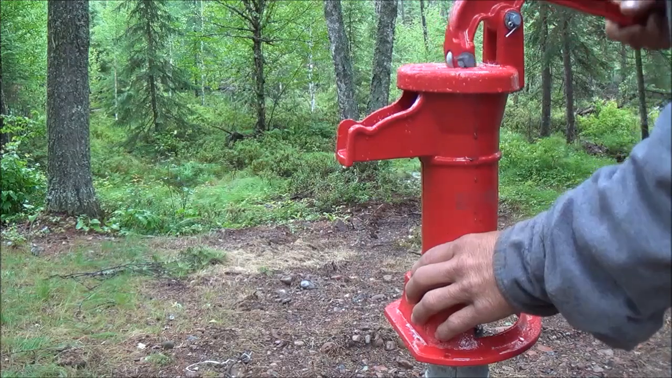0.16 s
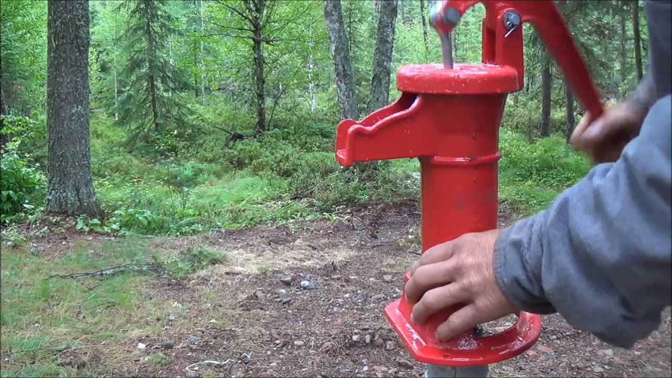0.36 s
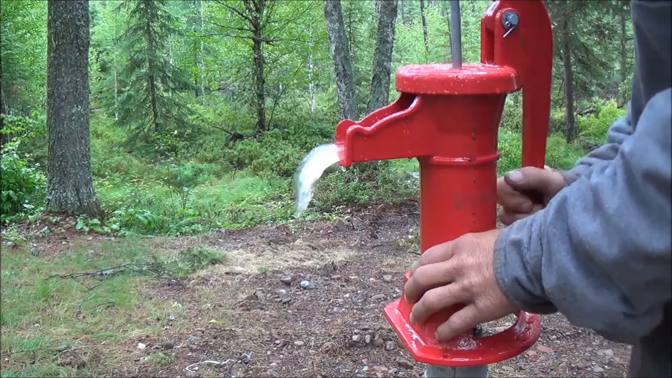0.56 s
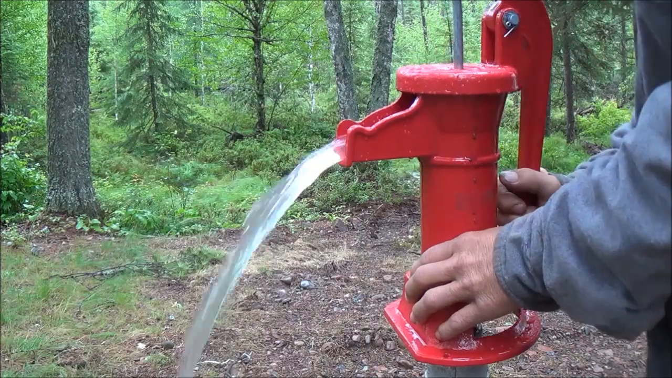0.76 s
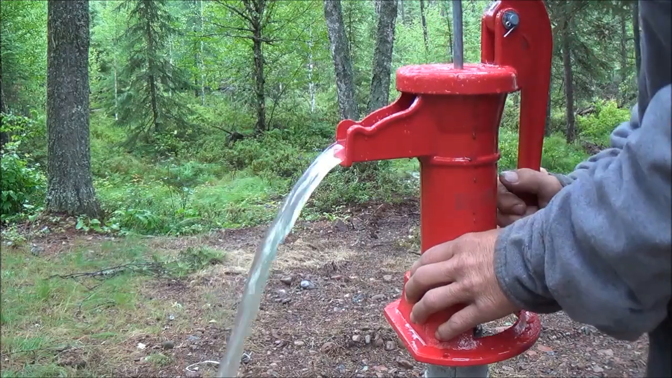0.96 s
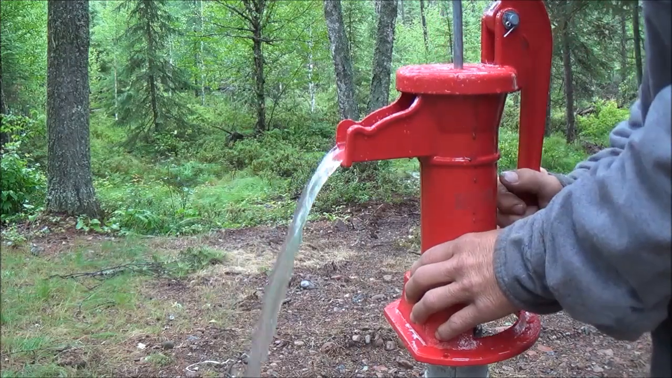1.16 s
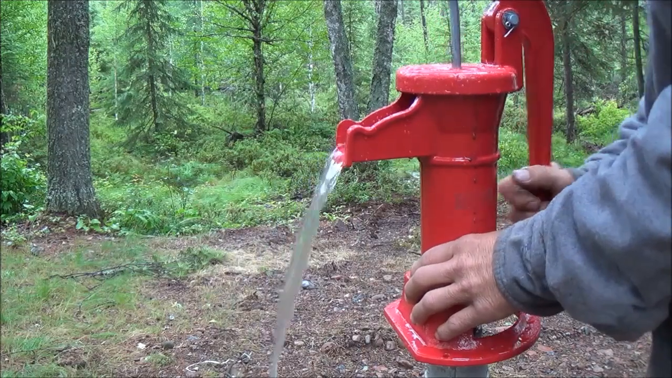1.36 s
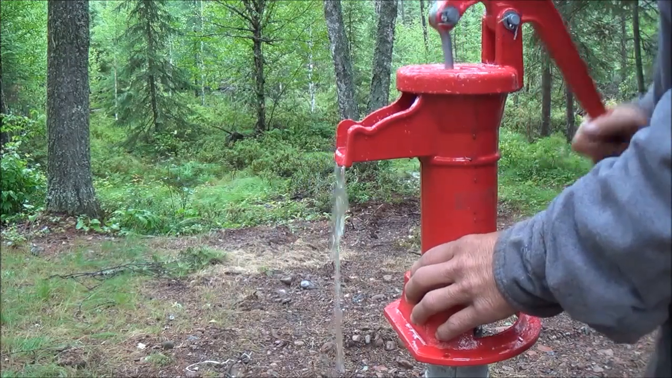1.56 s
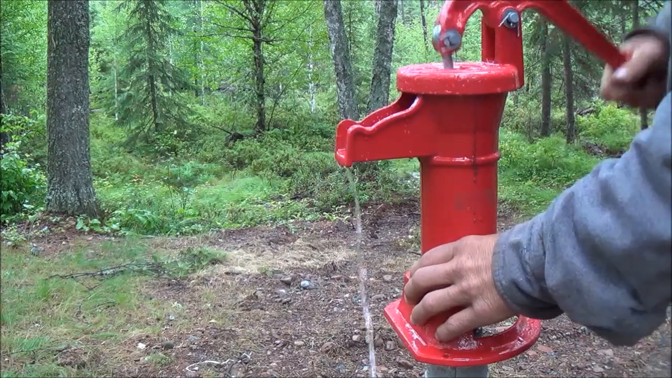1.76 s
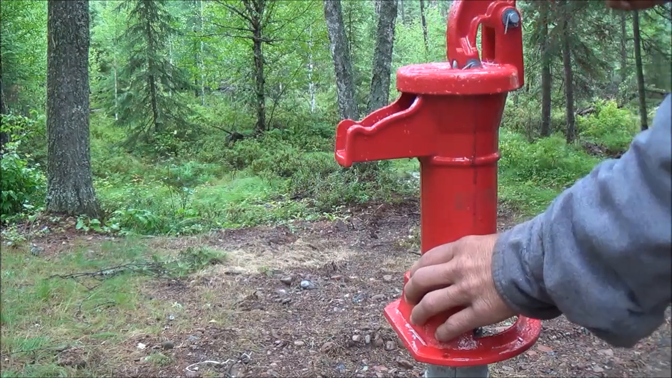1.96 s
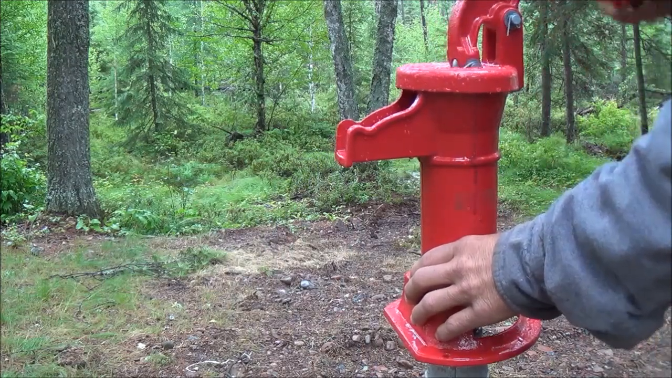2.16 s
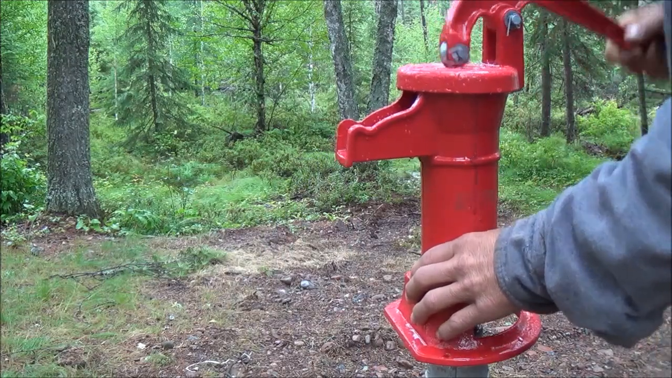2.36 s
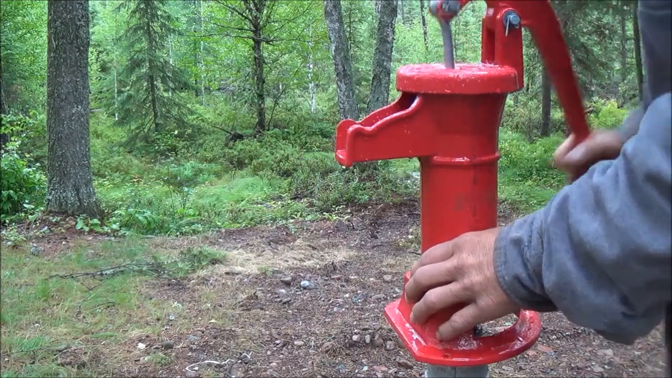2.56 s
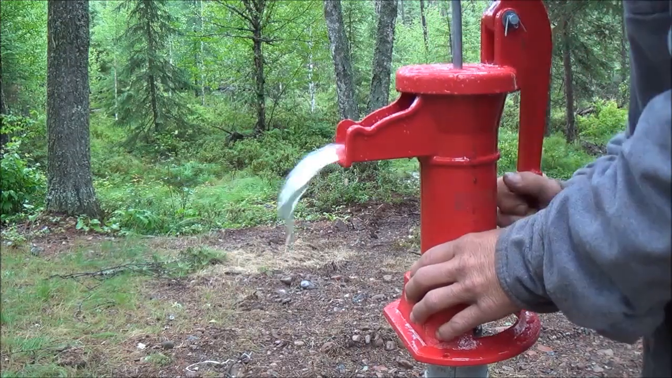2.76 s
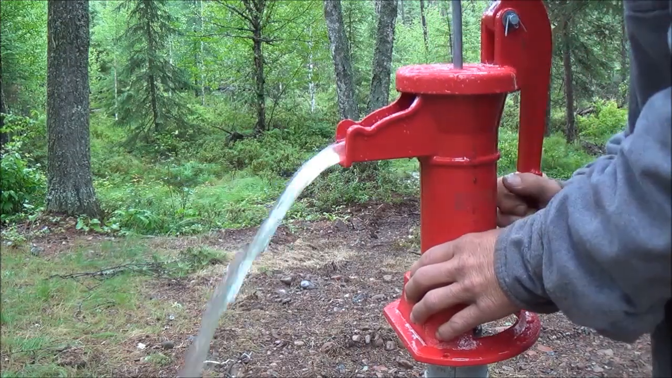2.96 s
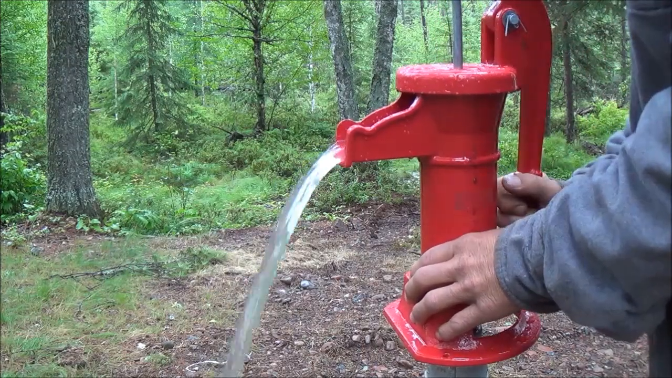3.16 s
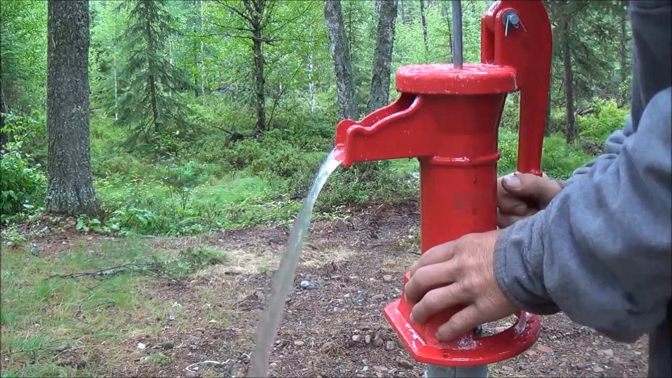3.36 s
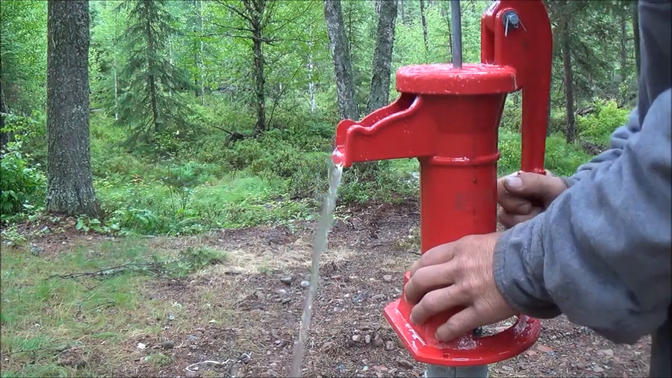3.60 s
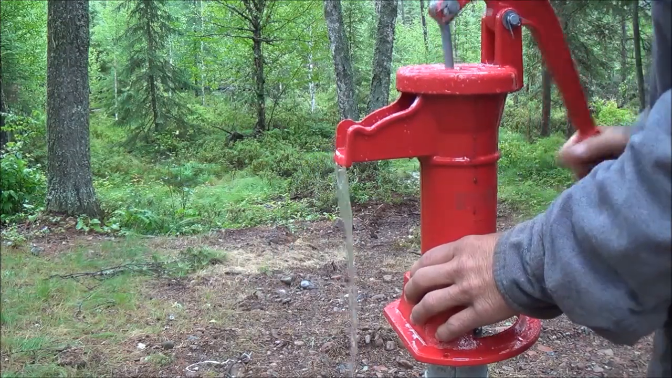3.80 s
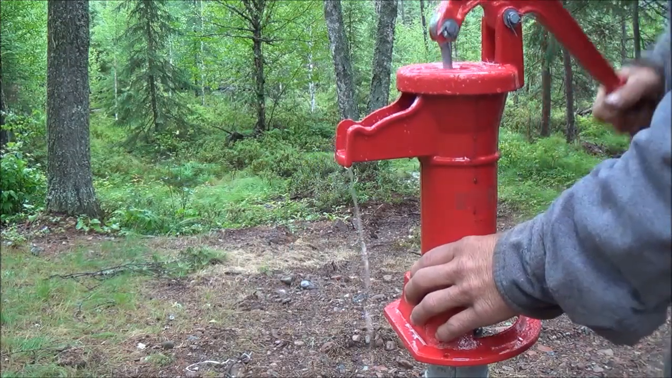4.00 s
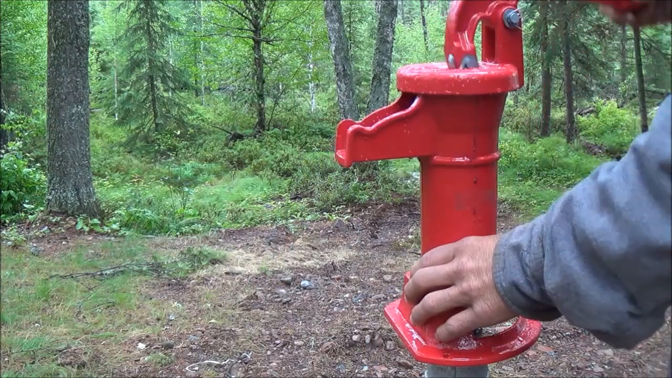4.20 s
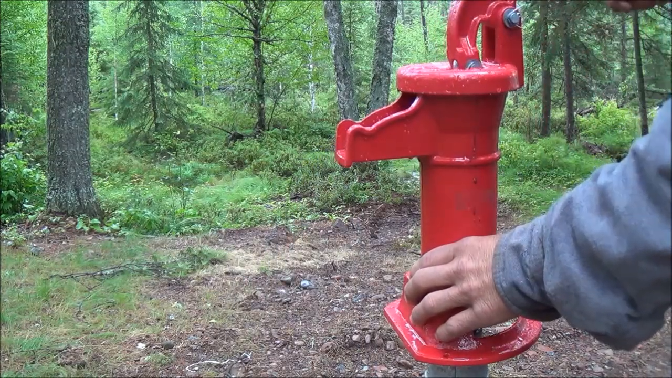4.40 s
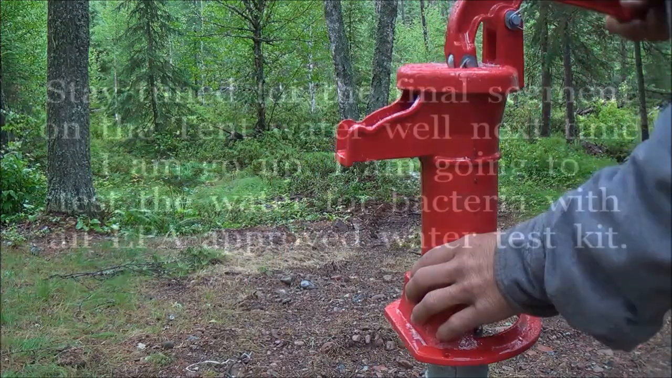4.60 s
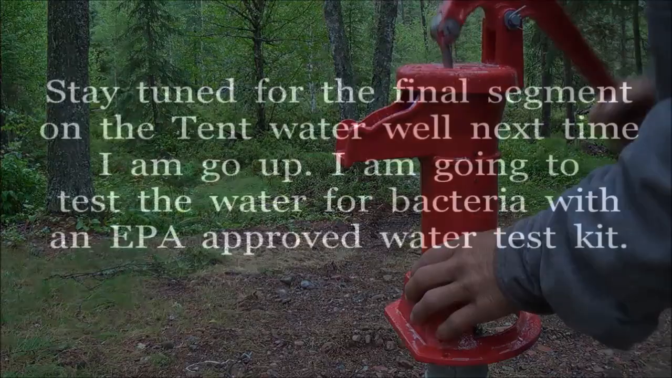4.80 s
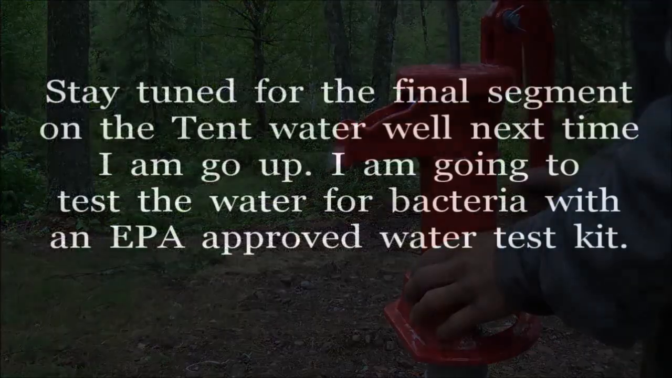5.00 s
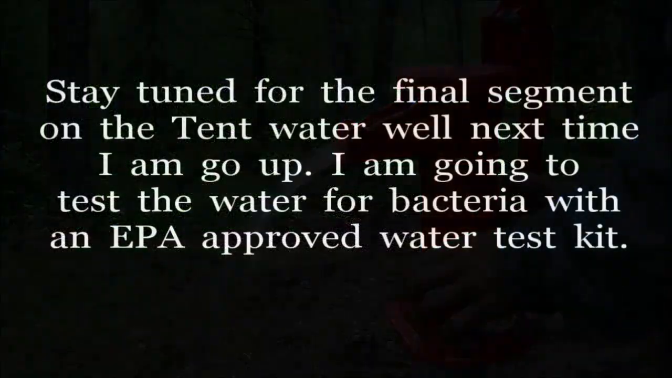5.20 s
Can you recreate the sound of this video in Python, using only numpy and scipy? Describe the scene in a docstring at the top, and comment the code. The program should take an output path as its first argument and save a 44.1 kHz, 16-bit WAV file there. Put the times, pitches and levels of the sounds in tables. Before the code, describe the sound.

Last drops patter, an iron pump handle clanks, and water bursts out in two bright, gurgling surges onto wet ground in a forest clearing.

```python
"""Single drops patter and air gulps in a spout first: the tail of a surge from a cast-iron hand pump in a
forest clearing. Two more surges follow: shaped spray over a lower slosh, with noise-burst drops, and gulps
and bubbles as fluttering tones. Between them clanks and a rubbing rod excite the modes of the casting;
the linkage taps and the pivot squeaks. Forest echo, wind on the microphone, hiss and a far hum lie below."""
import sys
import numpy as np
from scipy import signal
from scipy.fft import rfft, irfft
from scipy.io import wavfile

SR = 44100
rng = np.random.default_rng(int(sys.argv[2]) if len(sys.argv) > 2 else 0)


def transcribe(signal):
    """Save signal, clipped to [-1, 1], as a 16-bit WAV file at the path in sys.argv[1]."""
    frames = np.atleast_2d(signal).T
    limited = np.clip(frames, -1, 1)
    pcm = np.round(limited * 32767).astype(np.int16)
    wavfile.write(sys.argv[1], SR, pcm)


N = 231348

# water surges on the ground, one curve each: t/s, splash level/dB, puddle slosh level/dB
SURGE_CURVES = [
    [(0.0, -50, -77), (0.03, -44.5, -38), (0.16, -60, -117)],
    [(0.968, -59, -60), (0.976, -26.5, -49), (1.01, -20.5, -47.5), (1.15, -21.5, -30.5), (1.33, -21.5, -39),
     (1.5, -25.5, -43.5), (1.63, -23.5, -31), (1.8, -26.5, -48.5), (1.95, -31, -43.5), (2.12, -47.5, -63),
     (2.21, -41, -32), (2.26, -49, -65)],
    [(3.137, -50.5, -77), (3.2, -22.5, -40), (3.35, -21.5, -34.5), (3.6, -24, -44.5), (3.735, -26, -38),
     (3.91, -21.5, -42), (4.1, -35, -42.5), (4.38, -52.5, -60), (4.49, -47.5, -57), (4.537, -26, -47),
     (4.6, -100, -63)],
]
# splash spectrum, relative: f/Hz, density/dB
SPLASH_SPECTRUM = [(590, -9), (1000, -8.5), (2250, 10.5), (3690, 9), (4640, 11.5), (5180, 8.5), (10600, 12),
                   (11000, 11), (14300, -71), (22000, -120)]
# slosh spectrum, relative: f/Hz, density/dB
SLOSH_SPECTRUM = [(290, -49.5), (500, -17.5), (874, 1), (1080, -3), (1660, 3), (2500, -16), (3250, -15),
                  (5500, -120)]
# single drops landing: t/s, peak level before panning/dB, band pitch f/Hz
DROP_LANDINGS = [(0.016, -12, 10800), (0.0262, -10.5, 4450), (0.0394, -13, 9600), (0.063, -18, 3950),
                 (0.069, -9, 10300), (0.084, -15, 5570), (0.109, -14, 8590), (0.129, -12, 3560),
                 (0.196, -32, 10000), (0.553, -35, 10300), (0.974, -12.5, 10500), (0.9846, -13, 5400),
                 (1.023, -11, 11200), (1.0774, -3, 2400), (1.247, -16, 9500), (1.285, -11, 5400),
                 (1.299, -12, 1860), (1.34, -10, 1700), (1.426, -10, 3530), (1.5032, -5.5, 11000),
                 (1.5885, -13, 8300), (1.6136, -2.5, 2120), (1.6802, 0.5, 2440), (1.755, -6, 10900),
                 (1.776, -7, 3390), (1.7875, -4.5, 2450), (1.8036, -17, 2870), (1.829, -5.5, 3020),
                 (1.885, -0.5, 7450), (1.903, -18, 7400), (1.932, -7, 10000), (1.945, -5.5, 4240),
                 (1.958, -4, 3400), (1.9782, -6.5, 9500), (1.996, -10, 4990), (2.0065, -4.5, 7200),
                 (2.0292, -5, 10800), (2.05, -9, 4430), (2.084, -18, 5750), (2.0985, -16.5, 7750),
                 (2.1153, -18.5, 10700), (2.146, -6, 3350), (2.166, -22, 7040), (2.1927, -8, 3800),
                 (2.209, -2.5, 10200), (2.9307, -30.5, 4800), (3.1407, -11.5, 10000), (3.1562, -10.5, 5760),
                 (3.1675, -7, 7200), (3.1856, -3, 2900), (3.218, -2.5, 2850), (3.3057, -10, 2270),
                 (3.513, -18, 9570), (3.5411, -4.5, 9840), (3.59, -16, 3960), (3.738, -4, 1420),
                 (3.754, -1, 2970), (3.807, -25, 8000), (3.8348, -2, 1960), (3.872, -2, 10800),
                 (3.9252, 0, 2980), (3.97, -2.5, 4680), (3.989, -7.5, 7360), (4.0094, 0.5, 10400),
                 (4.0244, -1, 2360), (4.0342, -8, 2980), (4.0516, -14, 7630), (4.0638, -7.5, 10650),
                 (4.0737, -4.5, 4950), (4.0895, -8.5, 2920), (4.102, -7, 10100), (4.113, -6.5, 10100),
                 (4.13, -11, 7330), (4.142, -2, 10100), (4.1652, -6, 7050), (4.1923, -8, 4530),
                 (4.206, -12, 5000), (4.2255, -10.5, 7500), (4.2368, -7.5, 5200), (4.2668, -2, 11500),
                 (4.279, -14, 6000), (4.3057, -6, 4870), (4.313, -8.5, 1440), (4.332, -8, 10100),
                 (4.357, -13, 10000), (4.385, -21.5, 10200), (4.4214, -19, 6900), (4.497, -16, 1790),
                 (4.511, -24, 3150), (4.5252, -9.5, 4700), (4.533, -7, 2320), (4.973, -28, 8080)]
# air gulping in the spout: t/s, tone level/dB, starting pitch f/Hz, t60/s
SPOUT_GULPS = [(0.023, -24.5, 598, 0.059), (0.063, -14.5, 475, 0.03), (0.14, -35, 585, 0.1),
               (1.405, -33.5, 702, 0.053), (1.547, -25, 584, 0.022), (1.578, -26.5, 602, 0.21),
               (1.636, -19, 595, 0.069), (1.695, -36.5, 398, 0.062), (1.735, -16.5, 606, 0.094),
               (1.754, -23, 580, 0.089), (1.836, -33.5, 589, 0.16), (1.876, -21.5, 602, 0.065),
               (1.905, -33, 620, 0.072), (1.928, -30.5, 301, 0.16), (1.955, -30, 735, 0.075),
               (1.995, -24, 774, 0.091), (2.019, -25, 560, 0.078), (2.09, -36.5, 392, 0.093),
               (2.148, -26.5, 563, 0.063), (2.181, -15.5, 561, 0.074), (2.212, -13, 560, 0.055),
               (3.879, -27.5, 581, 0.25), (3.914, -17.5, 614, 0.0097), (3.944, -37, 553, 0.068),
               (3.983, -16, 585, 0.1), (4.025, -17, 618, 0.063), (4.039, -18.5, 599, 0.089),
               (4.059, -38, 630, 0.062), (4.165, -22.5, 630, 0.017), (4.179, -30, 680, 0.19),
               (4.235, -19.5, 615, 0.078), (4.269, -32, 615, 0.075), (4.306, -33, 629, 0.087),
               (4.329, -31, 577, 0.078), (4.427, -40.5, 588, 0.11), (4.461, -29, 452, 0.2),
               (4.513, -17, 557, 0.1), (4.538, -16.5, 582, 0.06)]
# small bubbles bursting in the puddle: t/s, tone level/dB, starting pitch f/Hz, t60/s
PUDDLE_BUBBLES = [(1.063, -23, 2280, 0.048), (1.2106, -22.5, 2480, 0.052), (1.6222, -21.5, 1960, .024),
                  (1.6796, -19, 2580, 0.018), (1.7356, -15, 1736, 0.047), (1.86, -41, 1510, .03),
                  (1.9217, -23.5, 1580, 0.03), (2.0204, -24, 1950, 0.015), (3.5927, -11, 1950, 0.0073),
                  (3.71, -24, 1300, 0.032), (3.8352, -20, 1980, 0.028), (3.914, -23, 1330, .026),
                  (4.1026, -23.5, 2280, 0.014), (4.5146, -34, 2070, 0.033), (4.5366, -28, 2000, 0.036),
                  (4.568, -40, 1750, .03)]
# linkage taking up slack: t/s, level/dB
SLACK_CLANKS = [(0.652, -14.5), (2.744, -12.5), (5.077, -13)]
# modes of the cast-iron head and handle: f/Hz, level/dB, t60/s
IRON_MODES = [(845, -5, 0.071), (933, -7.5, 0.092), (1276, -25, 0.073), (1530, -15, 0.02),
              (1700, -12, 0.027), (1860, -11, 0.095), (1950, 0.5, 0.015), (2160, -13, 0.031),
              (2110, -18, 0.044), (2750, -1.5, 0.035), (3354, -14.5, 0.064), (3680, -3, 0.012),
              (4214, 1, 0.0077), (4148, 3.5, 0.013), (4240, 4, 0.0084), (4800, -8, 0.04),
              (4950, -8.5, 0.018), (5290, -11, 0.028), (6510, -25.5, 0.1), (8800, -13, 0.031),
              (10100, -11, 0.016)]
# handle in motion between surges, one curve each: t/s, rod rub level/dB, background hiss level/dB
STROKE_CURVES = [
    [(0.0, -58, -44), (0.38, -49, -47.5), (0.5, -55, -51.5), (0.71, -66, -51.5), (0.95, -57, -54.5)],
    [(2.26, -65, -48), (2.45, -52, -49), (2.63, -53.5, -48), (2.68, -54.5, -51), (2.92, -53.5, -51.5),
     (3.12, -63, -55.5)],
    [(4.6, -72, -48.5), (4.79, -50.5, -48), (4.96, -61, -49), (5.246, -58, -48.5)],
]
# light taps in the linkage as the handle turns round: t/s, level/dB
LINKAGE_TAPS = [(0.262, -24.5), (0.325, -44), (0.472, -31), (2.426, -29.5), (2.654, -34.5), (2.894, -34),
                (4.79, -30)]
# pivot squeaks, one curve each: t/s, f/Hz, level/dB
SQUEAK_CURVES = [
    [(.4, 1080, -75), (.43, 1048, -55), (.455, 975, -58), (.485, 859, -55), (.52, 920, -58),
     (.56, 940, -61), (.58, 920, -80)],
    [(2.43, 1004, -60), (2.47, 1070, -52), (2.51, 1116, -60), (2.545, 1142, -61), (2.58, 1038, -60),
     (2.61, 970, -43.5), (2.65, 850, -57), (2.705, 938, -51), (2.735, 937, -78)],
    [(4.89, 997, -78), (4.92, 942, -46), (4.96, 915, -56), (5.0, 935, -66), (5.04, 927, -62),
     (5.07, 900, -80)],
]
# wind on the microphone: t/s, level/dB
GUST_CURVE = [(0.0, -50), (0.76, -48.5), (1.2, -60), (1.58, -43), (2.03, -50.5), (2.59, -44), (2.75, -54),
              (3.25, -44.5), (3.7, -36.5), (4.05, -39), (4.3, -35), (4.5, -33.5), (4.95, -38), (5.25, -50)]
# wind spectrum, relative: f/Hz, density/dB
WIND_SPECTRUM = [(12, -52), (20, 20.5), (43, -7), (64, 5), (158, -2.5), (296, -18.5), (400, -30),
                 (520, -56), (880, -120)]
# puffs thumping the microphone: t/s, peak level/dB, f/Hz
WIND_BUFFETS = [(3.305, -40, 110), (3.523, -24, 68.4), (3.76, -36.5, 113), (3.854, -29, 92),
                (4.112, -34, 54), (4.229, -39, 40.4), (4.469, -37, 114), (4.62, -33, 56.5)]
# hiss spectrum, relative: f/Hz, density/dB
HISS_SPECTRUM = [(120, -28), (200, -7), (229, -25), (270, -8.5), (440, 2.5), (595, -6.5), (636, -2),
                 (11000, -13), (14300, -63), (22000, -120)]
# left-right likeness of wind and hiss: f/Hz, correlation/1
CHANNEL_LIKENESS = [(30, 0.19), (60, 0.78), (120, 0.71), (300, 0.78), (1000, 0.3), (4000, 0.087),
                    (10000, 0.82)]

DROPLETS_PER_S, FULL_FLOW_DB, RATE_EXPONENT = 3500, -23, 0.3   # rate at full flow; exponent on splash gain
CHOP_FULL_DB, CHOP_THIN_DB, THIN_BELOW_DB = 0.63, 4, 24   # chop grows over this fall below full flow
SPLASH_SIDE_DB = -14.5   # side re mid
GURGLE_PER_S, SPOUT_HZ, SPOUT_T60_S = 400, 599, 0.02
GURGLE_RE_SPLASH_DB, GURGLE_RE_GULP_DB, STIR_T60_S = -27.5, -18, 0.12
DROP_T60_S, DROP_T60_SPREAD_DB, DROP_PAN_SPREAD_DB = 0.023, 0.5, 3   # median t60; chance spreads
CHIRPS_PER_S, CHIRP_RE_SLOSH_DB, CHIRP_LOW_HZ, CHIRP_HIGH_HZ = 32, -10, 730, 2450   # least level
GULP_LEAD_RAD = 0.73   # left ahead of right
REBOUND_DELAY_S, REBOUND_RE_CLANK_DB = 0.036, -24
SHIVER_RE_CLANK_DB, SHIVER_T60_S = -10, 0.2   # countless faint modes of the casting, as one noise
FOREST_T60_S, FOREST_DB = 0.55, -26.5
BUFFET_SWELL_S, BUFFET_T60_S = 0.0063, 0.12
HUM_HZ, HUM_WIDTH_HZ, HUM_DB = 121, 8.9, -54
MIC_LOW_HZ, MIC_CEILING, MIC_TOP_HZ = 44.3, 0.56, 11050   # ceiling re full scale 1
LEFT_RIGHT = np.array([[1], [-1]])


def from_db(db):
    """Gain of a level in dB."""
    return 10 ** (np.asarray(db) / 20)


def rms_one(x):
    """Scaled to rms 1."""
    return x / np.sqrt(np.mean(x ** 2) + 1e-20)


def in_time(rows):
    """Columns of a curve table at every sample."""
    s, *columns = np.transpose(rows)
    return [np.interp(np.arange(N) / SR, s, c) for c in columns]


def at_hz(points, hz):
    """A table read on a log-frequency axis."""
    table_hz, values = np.transpose(points)
    return np.interp(np.log(hz), np.log(table_hz), values)


def bin_hz():
    """FFT bin frequencies, kept off zero for the log axis."""
    return np.maximum(np.fft.rfftfreq(N, 1 / SR), 1)


def colour(x, spectrum):
    """White input shaped to a spectrum; rms 1."""
    return rms_one(irfft(rfft(x) * from_db(at_hz(spectrum, bin_hz())), N))


def wide_noise(spectrum):
    """Stereo noise whose channel correlation depends on frequency; rms 1."""
    hz = bin_hz()
    mid, side = rfft(rng.standard_normal((2, N)))
    alike = np.clip(at_hz(CHANNEL_LIKENESS, hz), -1, 1)
    both = np.sqrt(1 + alike) * mid + np.sqrt(1 - alike) * side * LEFT_RIGHT
    return rms_one(irfft(both * from_db(at_hz(spectrum, hz)), N))


def drift(rate_hz):
    """Slow chance of rms 1: noise at every 20th sample through a double one-pole low-pass."""
    r = np.exp(-40 * np.pi * rate_hz / SR)
    noise = rng.standard_normal(N // 20 + 2002)
    slow = signal.lfilter([1], [1, -2 * r, r * r], noise)[2000:]   # settled part
    return np.interp(np.arange(N) / 20, np.arange(len(slow)), rms_one(slow))


def ring(x, hz, t60):
    """Two-pole resonance: a unit click starts a decaying sine of height about 1."""
    r, w = from_db(-60 / (t60 * SR)), 2 * np.pi * hz / SR
    return signal.lfilter([0, np.sin(w)], [1, -2 * r * np.cos(w), r * r], x + 1e-18)


def filtered(x, order, hz, kind):
    """Butterworth filter."""
    return signal.sosfilt(signal.butter(order, hz, kind, fs=SR, output="sos"), x)


def add(out, s, sound):
    """Mixes a short sound in at time s."""
    i = round(s * SR)
    out[:, i:i + sound.shape[1]] += sound[:, :N - i]


def impacts(per_s, spread_db):
    """Random clicks of uneven size; sparse and dense stretches carry the same power on average."""
    sizes = from_db(spread_db * np.minimum(rng.exponential(1, N), 4)) * rng.choice([-1, 1], N)
    return sizes * (rng.random(N) < per_s / SR) / np.sqrt(per_s)


def surge():
    """The stream breaking on the ground: bright splash, lower slosh, and the gurgle in the spout."""
    t = np.arange(N) / SR
    gains = np.zeros((2, N))
    for rows in SURGE_CURVES:
        on = (t >= rows[0][0]) & (t < rows[-1][0])
        gains = gains + on * from_db(in_time(rows))
    splash_gain, slosh_gain = gains
    per_s = DROPLETS_PER_S * (splash_gain / from_db(FULL_FLOW_DB)) ** RATE_EXPONENT
    per_s = np.clip(per_s, 300, 20000)
    mid, side = (droplets(per_s, spread_db=6.5, cycles=8.3, bed=1.13) for _ in range(2))
    spray = mid + from_db(SPLASH_SIDE_DB) * side * LEFT_RIGHT
    gurgle_gain = stirred() + from_db(GURGLE_RE_SPLASH_DB) * splash_gain
    spout = gurgle_gain * (gurgle() + 0.39 * gurgle() * LEFT_RIGHT)
    # steady when full, choppy when thin
    thin = np.clip((FULL_FLOW_DB - 20 * np.log10(splash_gain + 1e-9)) / THIN_BELOW_DB, 0, 1)
    clumps = from_db((CHOP_FULL_DB + CHOP_THIN_DB * thin) * drift(35))
    slops = from_db(2.0 * drift(25))
    splash = clumps * splash_gain * colour(spray, SPLASH_SPECTRUM)
    return splash + slops * slosh_gain * colour(spray, SLOSH_SPECTRUM) + spout


def droplets(per_s, spread_db, cycles, bed):
    """Impacts and a bed of spray dealt to pitches that ring a few cycles; patches of pitches flicker."""
    hits = rms_one(impacts(per_s, spread_db)) + bed * rng.standard_normal(N)
    pitches, dealt = np.geomspace(400, 12000, 24), rng.integers(0, 24, N)
    # three neighbouring pitches share a patch
    patches = [from_db(1.5 * drift(30) + 3.2 * drift(90)) for _ in range(8)]
    rings = np.zeros(N)
    for k, hz in enumerate(pitches):
        rings += hz * patches[k // 3] * ring(hits * (dealt == k), hz, cycles / hz)
    return from_db(2.1 * drift(126)) * rms_one(rings)


def gurgle():
    """Bubbles of many sizes burst in the spout and excite its air column; rms 1."""
    hits = impacts(GURGLE_PER_S, spread_db=3.5)
    pitches, dealt = np.geomspace(340, 2100, 12), rng.integers(0, 12, N)
    plops = sum(ring(hits * (dealt == k), hz, 14.0 / hz) for k, hz in enumerate(pitches))
    soft = signal.lfilter([0.15], [1, -0.85], plops)
    return rms_one(rms_one(soft) + 1.74 * rms_one(ring(soft, SPOUT_HZ, SPOUT_T60_S)))


def stirred():
    """Each gulp leaves the water in the spout stirred; the stir dies away."""
    kicks = np.zeros(N)
    for s, db, *_ in SPOUT_GULPS:
        kicks[round(s * SR)] = from_db(db + GURGLE_RE_GULP_DB)
    return signal.lfilter([1], [1, -from_db(-60 / (STIR_T60_S * SR))], kicks)


def drops():
    """Each drop is a dying noise burst, strongest in a band around its pitch."""
    out, t = np.zeros((2, N)), np.arange(2000) / SR
    chance = rng.standard_normal((len(DROP_LANDINGS), 2, 2001))
    for (s, db, hz), noise in zip(DROP_LANDINGS, chance):
        # last column: chance in length and place
        t60 = DROP_T60_S * from_db(DROP_T60_SPREAD_DB * noise[0, -1])
        pan_db = DROP_PAN_SPREAD_DB * noise[1, -1]
        burst = noise[:, :-1] * from_db(-60 * t / t60) * np.minimum(t / 0.00054, 1)
        band = signal.butter(1, [hz / 1.05, min(hz * 1.46, 0.45 * SR)], "band", fs=SR)
        mid, side = signal.lfilter(*band, burst) + 0.37 * np.diff(burst, prepend=0)
        stereo = (mid + from_db(SPLASH_SIDE_DB) * side * LEFT_RIGHT) / np.abs(mid).max()
        add(out, s, from_db(db + pan_db / 2 * LEFT_RIGHT) * stereo)
    return out


def bursting(rows, rise, rough, lead_rad, swell, slap_db):
    """Water slaps shut on an air pocket, which swells into a fluttering tone whose pitch creeps up."""
    out, t = np.zeros((2, N)), np.arange(6000) / SR
    chance = rng.standard_normal((len(rows), 7000))
    flutter = rms_one(filtered(chance, 2, 70, "low")[:, 1000:])
    for (s, db, hz, t60), wobble, noise in zip(rows, flutter, chance[:, :6000]):
        shape = (1 - np.exp(-t / max(swell, 1e-4))) ** 1.3 * from_db(-60 * t / t60)
        phase = 2 * np.pi * hz * (t + rise * t ** 2) + rough * wobble + lead_rad / 2 * LEFT_RIGHT
        tone = np.sin(phase) * (1 + rough * wobble[::-1]) * shape / shape.max()
        band = signal.butter(2, [hz * 0.54, hz * 2.0], "band", fs=SR)
        slap_shape = from_db(slap_db - 60 * t / 0.054) * np.minimum(t / 0.0021, 1)
        slap = slap_shape * rms_one(signal.lfilter(*band, noise))
        add(out, s, from_db(db + 0.6 * LEFT_RIGHT) * (tone + slap))
    return out


def gulps():
    """Air pockets gulping in the spout; the left channel leads in phase."""
    return bursting(SPOUT_GULPS, rise=0.53, rough=0.41, lead_rad=GULP_LEAD_RAD, swell=0.0037, slap_db=-6.5)


def bubbles():
    """Small puddle bubbles: purer tones with almost no slap."""
    return bursting(PUDDLE_BUBBLES, rise=1.66, rough=0.11, lead_rad=-0.17, swell=0.0021, slap_db=-28)


def chirps():
    """Tiny bubbles burst at random while the puddle sloshes, each gliding upward."""
    rows = []
    for curve in SURGE_CURVES:
        s, _, slosh_db = np.transpose(curve)
        length_s = s[-1] - s[0]
        count = round(CHIRPS_PER_S * length_s)
        for when, size, pitch in rng.random((300, 3))[:count]:
            at = s[0] + when * length_s
            hz = CHIRP_LOW_HZ * (CHIRP_HIGH_HZ / CHIRP_LOW_HZ) ** pitch
            db = np.interp(at, s, slosh_db) + CHIRP_RE_SLOSH_DB + 6.1 * size
            rows.append((at, db, hz, 31.0 / hz))
    return bursting(rows, rise=2.7, rough=0.22, lead_rad=-0.31, swell=0.0025, slap_db=7)


def radiated(x):
    """Small iron parts radiate no bass."""
    return filtered(x, 4, 650, "high")


def clanks():
    """One firm blow and a few ms of chattering contact ring the iron; a weaker rebound follows."""
    blow, chatter, shiver = np.zeros((3, 1, N))
    t = np.arange(12000) / SR
    chance = rng.standard_normal((len(SLACK_CLANKS), 3, 1, 12000))
    for (s, db), (first, second, wash) in zip(SLACK_CLANKS, chance):
        touch = from_db(db - 60 * t / 0.035) * np.minimum(t / 0.00012, 1)
        add(blow, s + 0.001015, from_db([[db]]))
        add(chatter, s, touch * first)
        add(chatter, s + REBOUND_DELAY_S, from_db(REBOUND_RE_CLANK_DB) * touch * second)
        add(shiver, s, from_db(db + SHIVER_RE_CLANK_DB - 60 * t / SHIVER_T60_S) * wash)
    strike = blow[0] + 0.04 * chatter[0]
    modes = np.zeros(N)
    for k, (hz, db, t60) in enumerate(IRON_MODES):
        modes += from_db(db + 2.5) * (-1) ** k * ring(strike, hz, t60)   # alternating sign
    clack = filtered(chatter[0] + shiver[0], 1, [1700, 5500], "band")
    return radiated(modes + from_db(-4.5) * clack)


def rod_rub(rub_db):
    """The rod rubs in the head: uneven scratch noise drives the iron modes, damped to 0.6 of their t60."""
    scratch = filtered(rng.standard_normal(N) * from_db(1.5 * drift(40)), 1, 1200, "low")
    modes = sum(from_db(db) * ring(scratch, hz, 0.6 * t60) for hz, db, t60 in IRON_MODES)
    return radiated(from_db(rub_db) * (rms_one(modes) + 0.2 * rms_one(scratch)))


def taps():
    """Damped by the hand, a tap is a dull burst with no ring."""
    out, t = np.zeros((1, N)), np.arange(1500) / SR
    for (s, db), noise in zip(LINKAGE_TAPS, rng.standard_normal((len(LINKAGE_TAPS), 1, 1500))):
        add(out, s, from_db(db - 60 * t / 0.024) * noise)
    return filtered(out[0], 1, [500, 3500], "band")


def squeak():
    """Stick and slip in the pivot: a weak tone that glides and wavers."""
    hz, db = in_time(np.concatenate(SQUEAK_CURVES))
    phase = 2 * np.pi * np.cumsum(hz * (1 + 0.025 * drift(56.5))) / SR
    return np.sqrt(2) * from_db(db + 2.7 * drift(50)) * np.sin(phase)


def forest(x):
    """Trunks scatter the sound back as a dull, dying wash, partly different in each channel."""
    t = np.arange(20000) / SR
    wash = rng.standard_normal((2, 20000)) * from_db(-60 * t / FOREST_T60_S) * (t > 0.008)
    mid, side = filtered(wash, 1, [600, 5000], "band")
    response = mid + 0.5 * side * LEFT_RIGHT
    response = response / np.sqrt(np.sum(response[0] ** 2))
    return from_db(FOREST_DB) * signal.fftconvolve(x[None], response, axes=1)[:, :N]


def wind():
    """Wind on the microphone: low noise under a gust curve with random swells."""
    return from_db(in_time(GUST_CURVE)[0] + 3.6 * drift(17)) * wide_noise(WIND_SPECTRUM)


def buffets():
    """A puff of air pushes the diaphragm: a few low, damped swings."""
    out, t = np.zeros((1, N)), np.arange(12000) / SR
    shape = (1 - np.exp(-t / BUFFET_SWELL_S)) * from_db(-60 * t / BUFFET_T60_S)
    for s, db, hz in WIND_BUFFETS:
        swings = np.sin(2 * np.pi * hz * t) * shape / shape.max()
        add(out, s, from_db(db) * swings[None])
    return out


def hiss(hiss_db):
    """Light background hiss: shaped noise of gently wavering level."""
    return from_db(hiss_db + 1.33 * drift(23)) * wide_noise(HISS_SPECTRUM)


def hum():
    """A far machine hum that wavers: noise in a narrow resonance, own in each channel."""
    t60 = np.log(1000) / (np.pi * HUM_WIDTH_HZ)
    return from_db(HUM_DB) * rms_one(ring(rng.standard_normal((2, N)), HUM_HZ, t60))


def scene():
    """Water and pump close by, the water's echoes, and the surroundings."""
    rub_db, hiss_db = in_time(np.concatenate(STROKE_CURVES))
    water = gulps() + surge() + drops() + chirps() + bubbles()
    pump = clanks() + rod_rub(rub_db) + taps() + squeak()
    pump = pump * from_db(0.4 * LEFT_RIGHT)   # slightly left
    echoes = forest(water.mean(axis=0))
    return water + pump + echoes + wind() + buffets() + hiss(hiss_db) + hum()


def record(dry):
    """The microphone loses the deepest bass, peaks are squeezed under a ceiling, the top is cut."""
    x = filtered(dry, 2, MIC_LOW_HZ, "high")
    x = x / (1 + (x / MIC_CEILING) ** 4) ** (1 / 4)
    return signal.sosfilt(signal.cheby1(11, 1, MIC_TOP_HZ, fs=SR, output="sos"), x)


dry = scene()
out = record(dry)
transcribe(out)
```